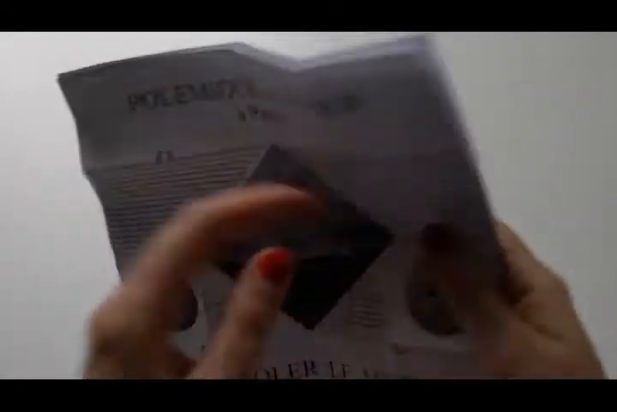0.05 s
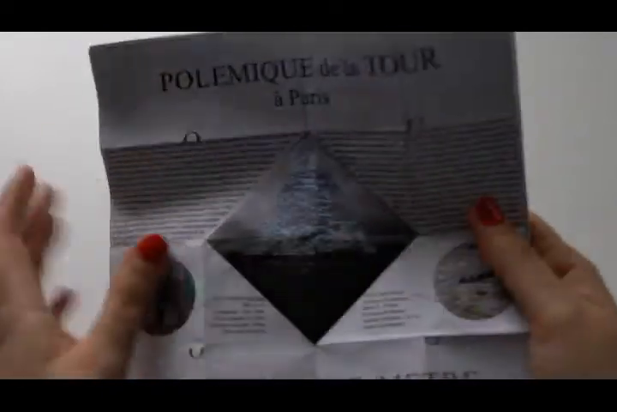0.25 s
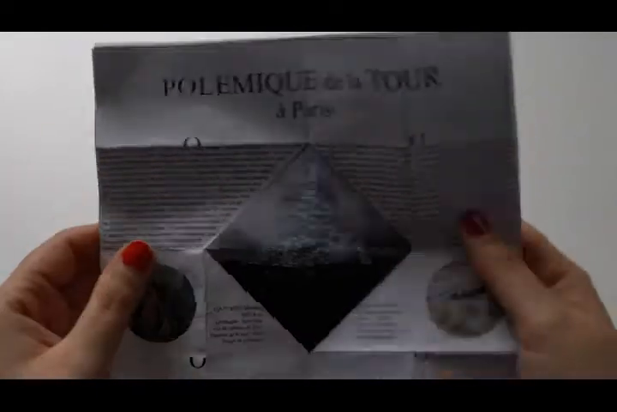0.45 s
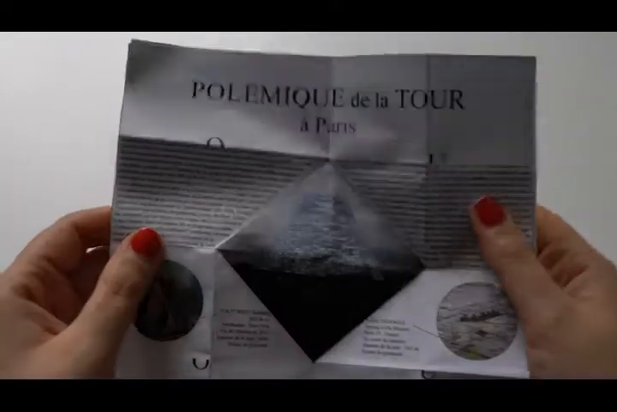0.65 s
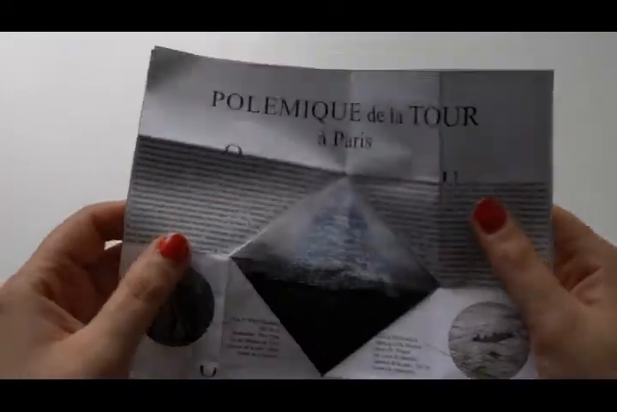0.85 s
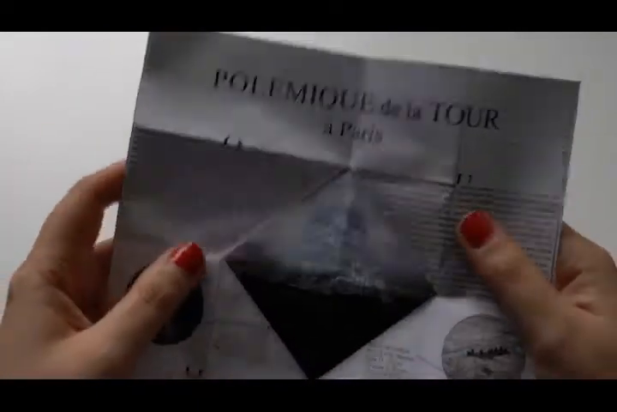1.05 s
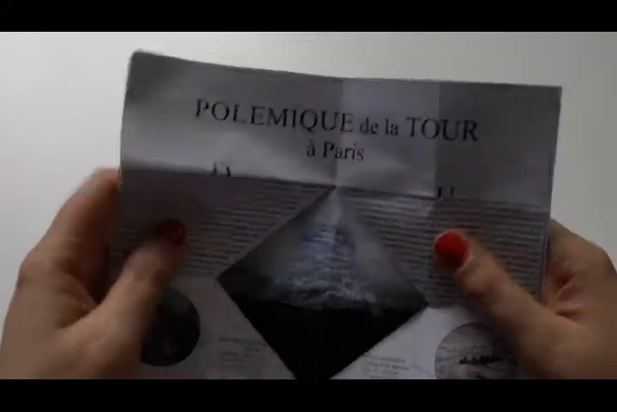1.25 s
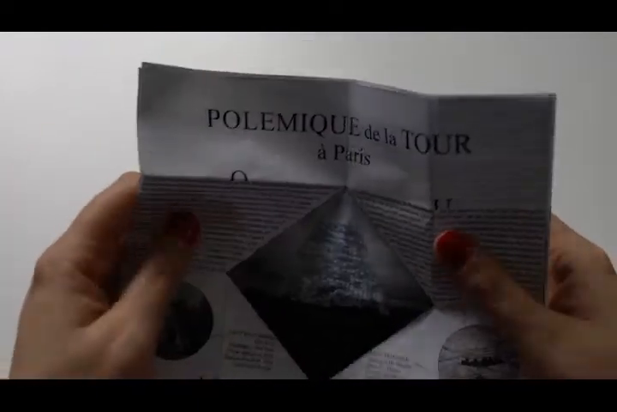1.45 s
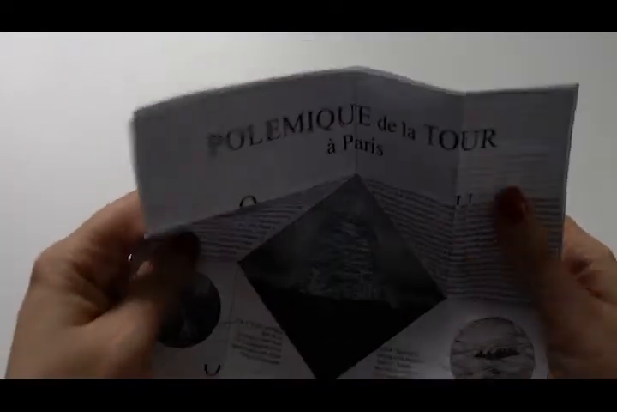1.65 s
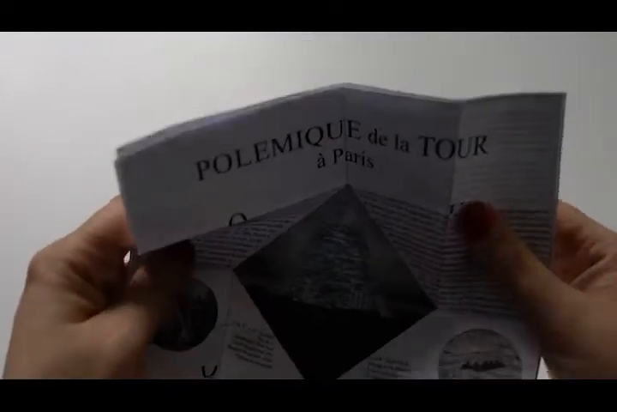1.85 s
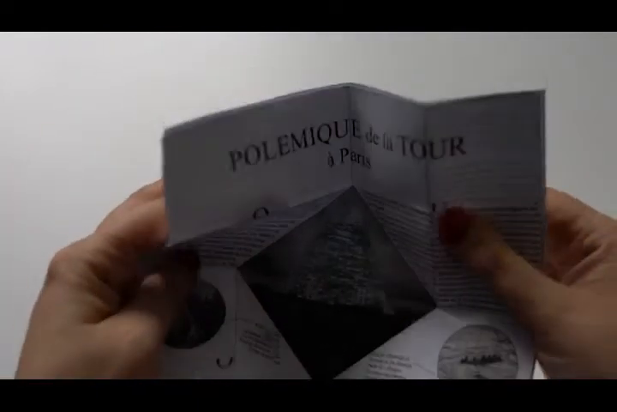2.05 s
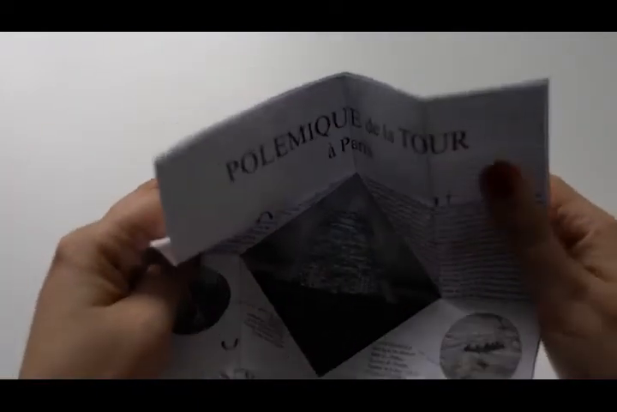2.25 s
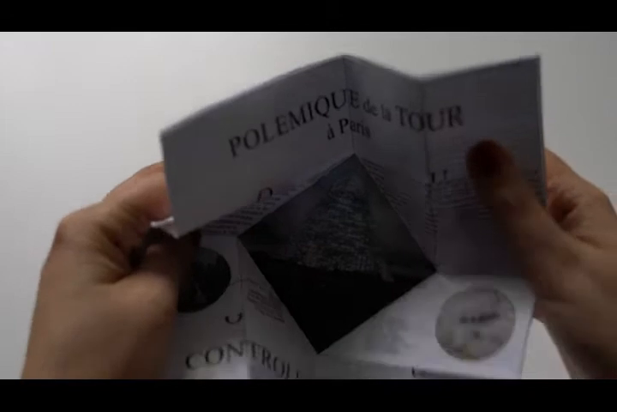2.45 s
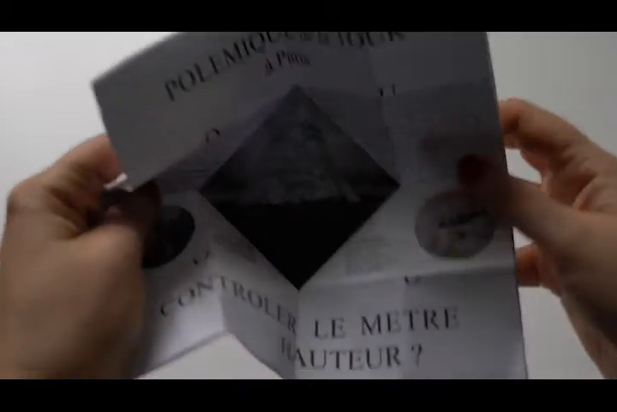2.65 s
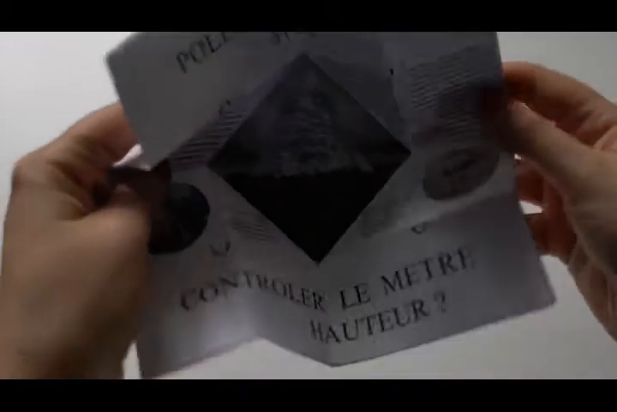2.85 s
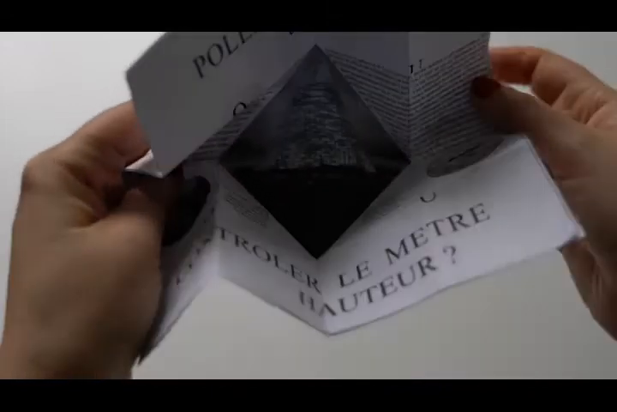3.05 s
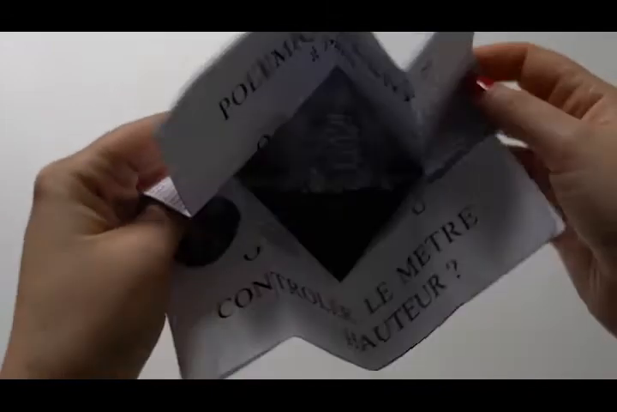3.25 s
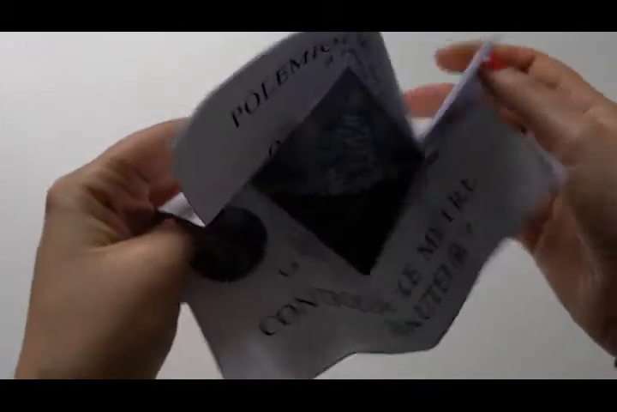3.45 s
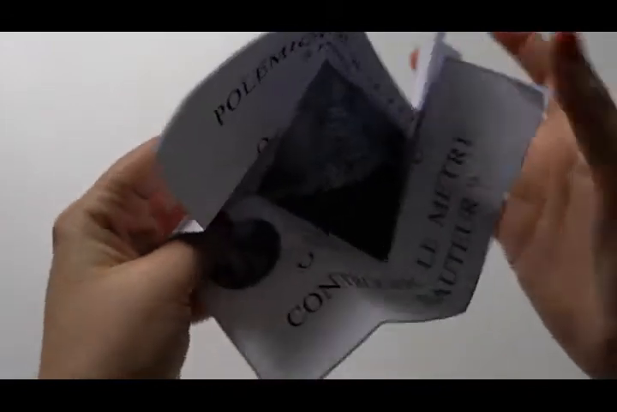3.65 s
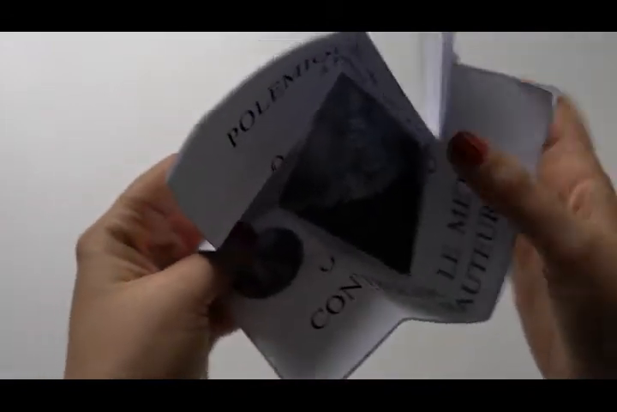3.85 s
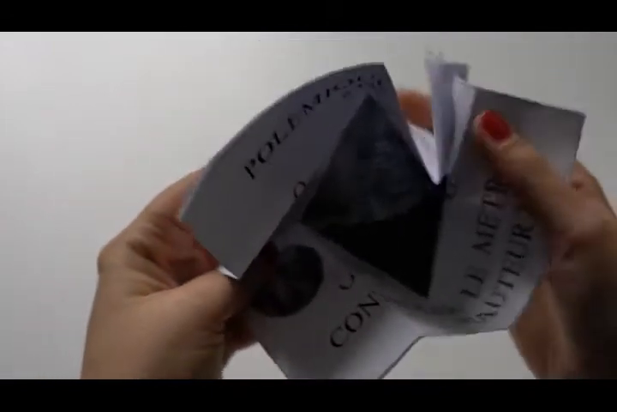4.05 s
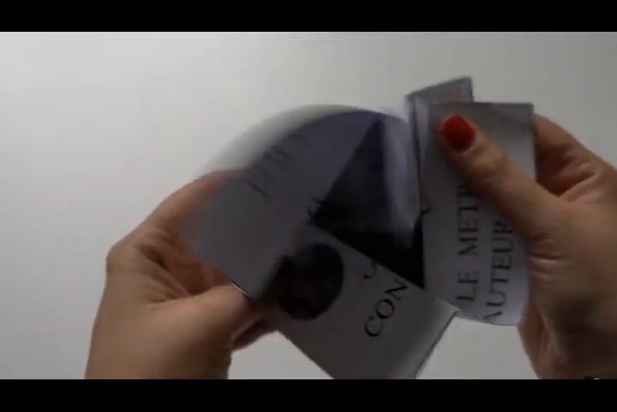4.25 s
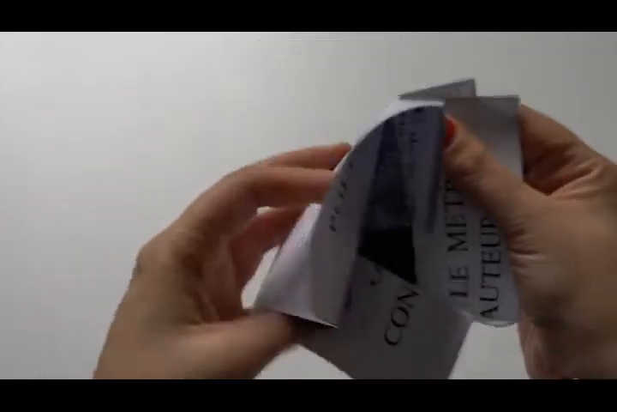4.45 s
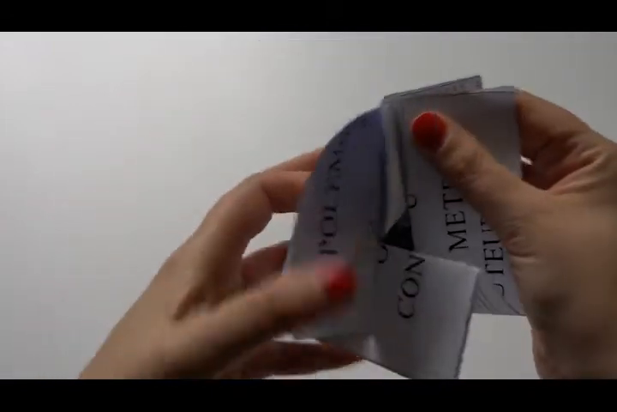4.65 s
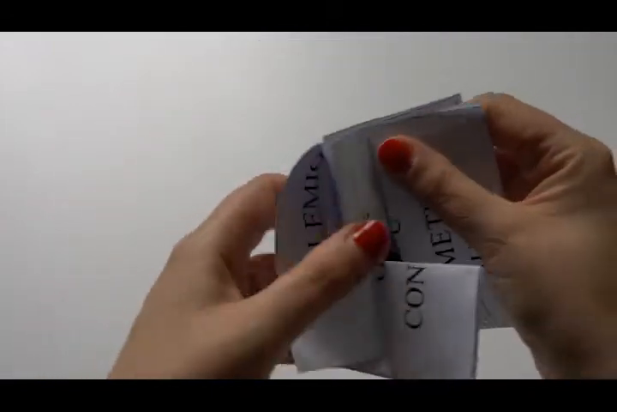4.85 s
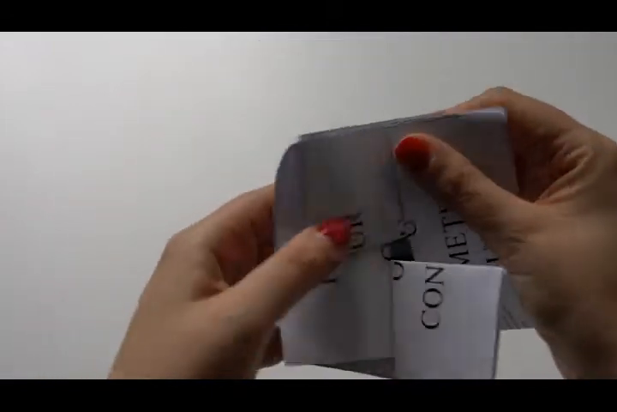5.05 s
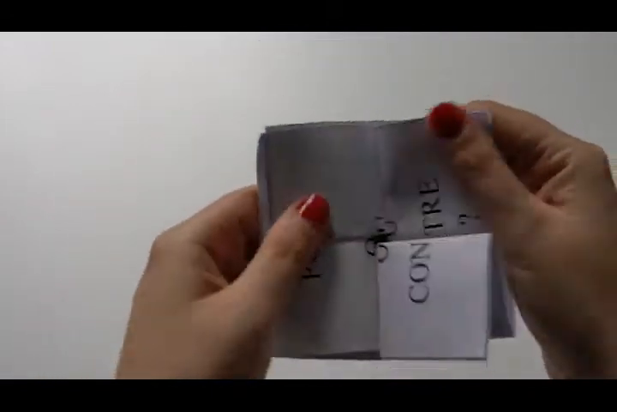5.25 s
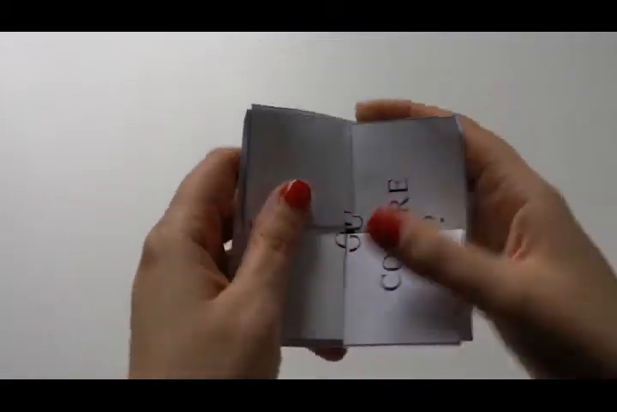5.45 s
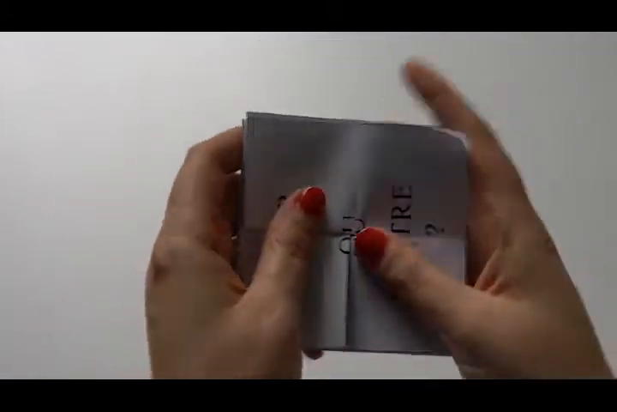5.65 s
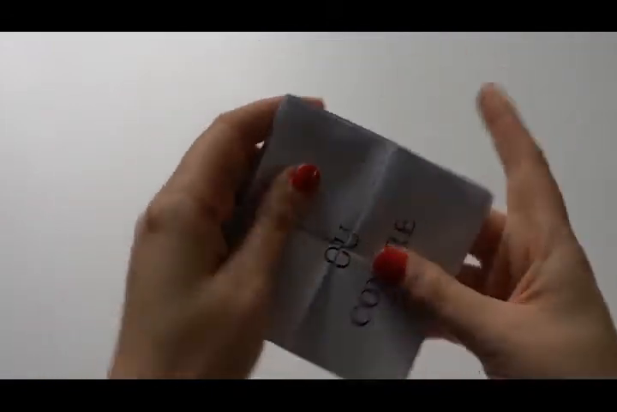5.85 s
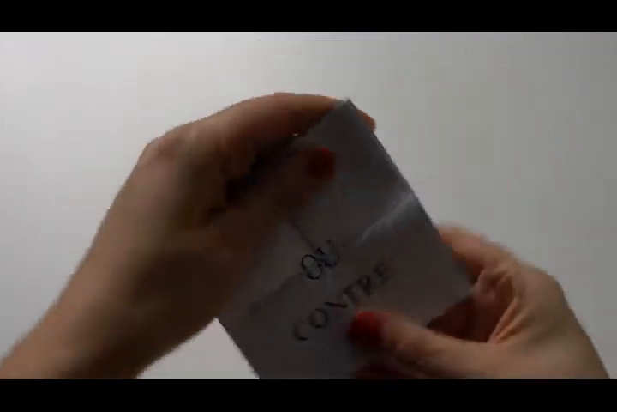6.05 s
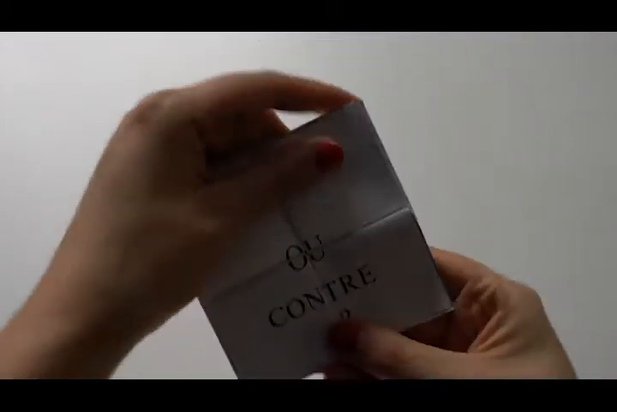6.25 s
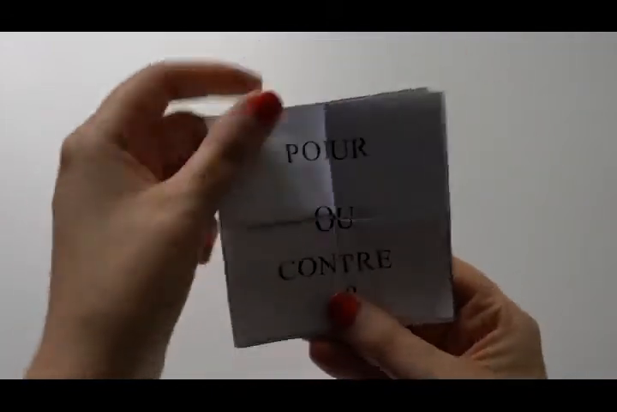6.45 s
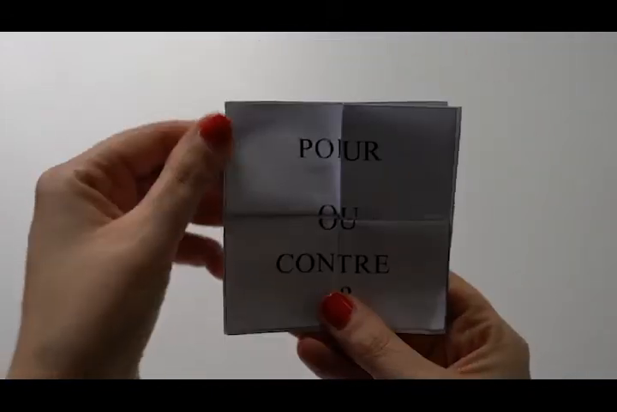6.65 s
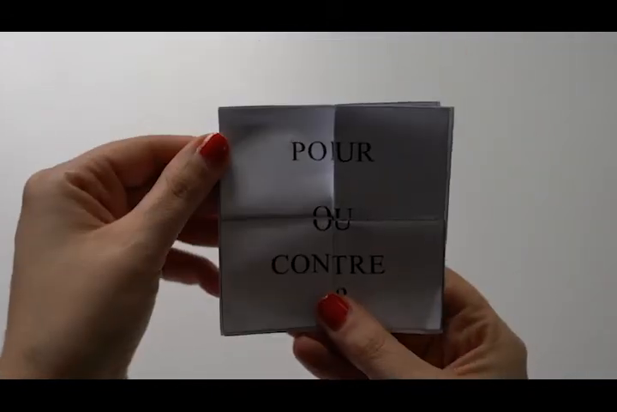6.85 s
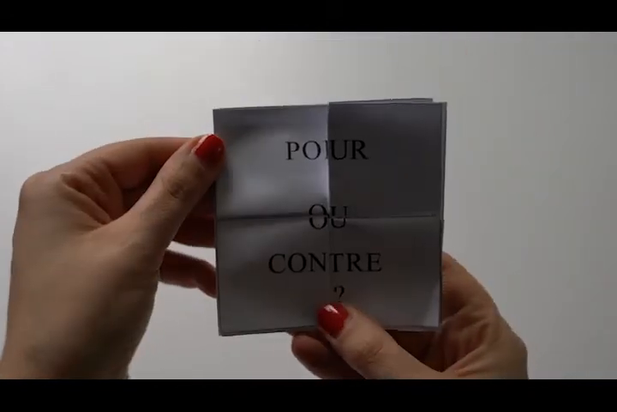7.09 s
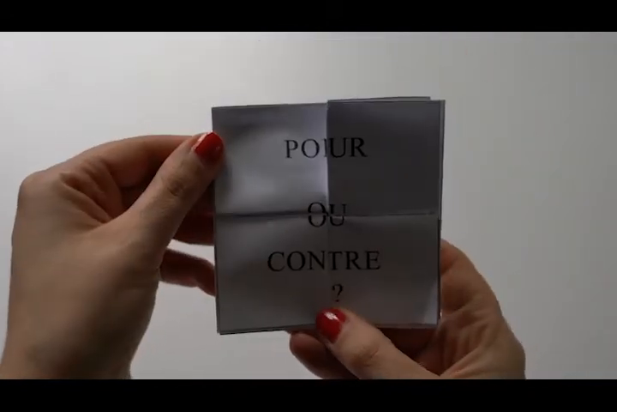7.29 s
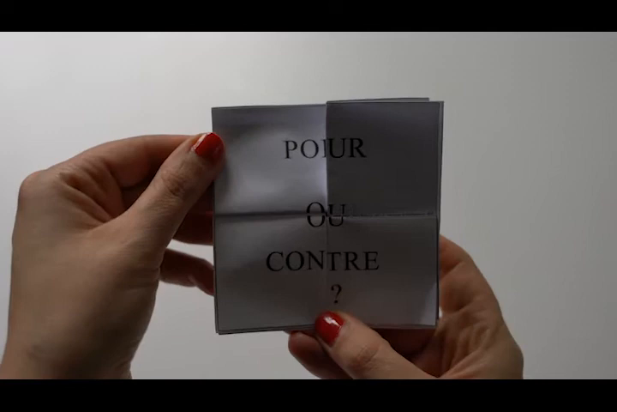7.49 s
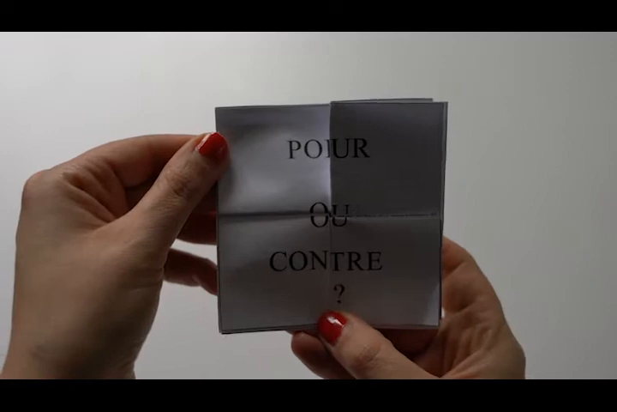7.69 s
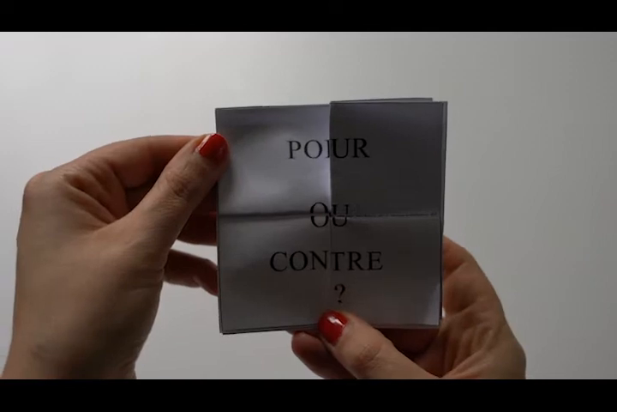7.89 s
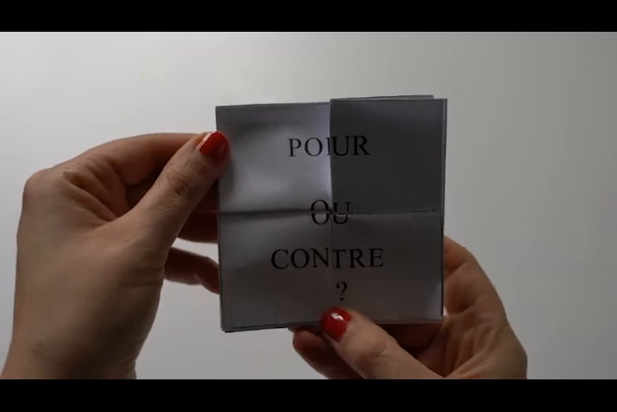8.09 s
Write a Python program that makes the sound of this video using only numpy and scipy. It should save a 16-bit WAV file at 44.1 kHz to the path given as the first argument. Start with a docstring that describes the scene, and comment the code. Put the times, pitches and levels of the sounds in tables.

```python
"""First comes a soft rub of paper over a quiet room with a distant hum; light snaps follow almost at once.
Two hands fold a printed paper leaflet above a desk, close to a camera.
Creases snap as short noise bursts ringing resonances; rubbing faces and hissing fingertips are
coloured, grainy noise shaped by strokes. Swung panels puff air, and the desk and walls answer the
snaps. The hum is a few unsteady sine tones over coloured noise."""
import sys
import numpy as np
from scipy import signal
from scipy.fft import rfft, irfft, next_fast_len
from scipy.io import wavfile
from scipy.ndimage import uniform_filter1d, map_coordinates

SR = 44100
rng = np.random.default_rng(int(sys.argv[2]) if len(sys.argv) > 2 else 0)


def persist_wave(psi):
    """Save psi, clipped to +-1, as 16-bit WAV."""
    counts = np.round(np.clip(psi, -1, 1) * 32767).astype(np.int16)
    wavfile.write(sys.argv[1], SR, np.atleast_2d(counts).T)


N = 358091

# Buckling creases; levels are the energy of each part, before a shared trim:
# (time [s], panel [dB], panel pitch [Hz], flap [dB], flap pitch [Hz], crack [dB], fibres [dB],
#  time the after-slips take to drop 9 dB [ms])
CREASE_SNAPS = [(0.0533, -30.5, 1710, -31.5, 477, -42.5, -55, 1.5),
                (0.0898, -28.5, 990, -30, 398, -46, -47, 1.6),
                (0.0993, -30, 1110, -25.5, 336, -31, -33, 5.7),
                (0.2363, -32, 1190, -25, 362, -42, -47, 1.3),
                (0.249, -23.5, 1290, -23.5, 308, -44, -38, 1.9),
                (0.4487, -29.5, 860, -24.5, 493, -32, -31.5, 7),
                (1.28, -18.5, 1640, -20.5, 467, -16, -19, 2.6),
                (1.2886, -17.5, 1140, -22, 306, -25, -9, 3.2), (1.315, -24, 960, -19.5, 454, -43, -37, 4.9),
                (1.4543, -28.5, 1650, -47, 400, -46, -49, 2.3),
                (1.5662, -17, 1640, -18.5, 382, -26, -52, 2.3),
                (1.6697, -26, 1290, -32, 370, -29, -28, 3.9), (1.745, -22, 1230, -33, 390, -43, -48, 1.6),
                (1.9127, -25, 1400, -23, 365, -30, -49, 2.9), (2.061, -11, 1600, -12, 277, -14.5, -36, 6),
                (2.2829, -13.5, 1440, -23.5, 380, -21, -33, 1.4),
                (2.385, -23.5, 940, -33, 327, -36, -52, 3.9), (2.4888, -38, 1920, -44, 367, -27, -30, 3.6),
                (2.56, -25, 744, -27.5, 232, -39, -50, 2.6), (2.6984, -15.5, 1290, -32, 247, -27, -38, 2.9),
                (2.891, -22, 1300, -23.5, 500, -38, -50, 4.2),
                (2.907, -27, 1800, -30, 260, -29.5, -42, 0.5), (2.9327, -38, 724, -19.5, 460, -47, -39, 3),
                (2.9833, -25, 810, -25, 380, -43, -44, 6.2),
                (3.0101, -17.5, 1410, -16.5, 384, -45, -50, 2.1),
                (3.07, -23, 1200, -27.5, 560, -38, -35, 2.2), (3.147, -26, 1680, -51, 346, -31, -40, 0.5),
                (3.56, -30.5, 1310, -28.5, 346, -48, -50, 1.4),
                (3.6859, -26.5, 1430, -31.5, 415, -29.5, -40, 5.5),
                (3.9302, -24, 1270, -25.5, 430, -28, -41, 8.1),
                (3.955, -29, 1250, -22, 270, -27, -30.5, 3.5),
                (4.0805, -13.5, 1750, -21, 510, -24.5, -56, 4.5),
                (4.1595, -1.5, 2000, -18.5, 620, -7, -15.5, 1.8),
                (4.2276, -21, 1600, -24, 465, -14.5, -33, 1.3),
                (4.277, -15.5, 850, -28, 437, -14, -34.5, 5.9), (4.2959, -9.5, 2180, -22, 430, -17, -48, 1),
                (4.3259, -20, 810, -24.5, 286, -47, -45, 8.6),
                (4.356, -24.5, 1750, -22, 380, -47, -47, 8.6), (4.453, -18.5, 815, -37, 530, -45, -46, 1.9),
                (4.4862, -19, 1170, -35, 270, -54, -46, 1), (4.5477, -14, 1970, -36, 432, -36, -39, 15),
                (4.5587, -9, 2240, -22, 270, -18, -4, 6.6), (4.5628, -14, 2230, -25, 295, -9, -20.5, 3.1),
                (4.9886, -8, 1540, -26.5, 334, -11, -43, 1.5), (5.0138, -15, 1850, -29, 356, -24, -46, 4.2),
                (5.056, -18.5, 1790, -23.5, 367, -27, -43, 1.5),
                (5.0883, -16, 2320, -29, 385, -5, -40, 0.25), (5.232, -36, 1240, -24, 283, -22, -26, 4.4),
                (5.3297, -3.5, 2220, -29, 396, -24, -53, 1.9),
                (5.4806, -14, 1460, -23, 495, -8.5, -3.5, 1.8),
                (5.605, -6.5, 1460, -18.5, 420, -2.5, -4, 2.3), (5.637, -22, 1260, -27, 330, -30, -42, 2),
                (5.8391, -18.5, 2300, -32, 332, -20, -57, 1.6),
                (5.978, -26.5, 1420, -34, 320, -39, -43, 2.6), (6.0393, -24, 850, -60, 470, -29.5, -37, 2),
                (6.2072, -29, 1760, -36.5, 290, -22.5, -24, 3.2),
                (6.3077, -20.5, 1120, -19.5, 470, -25, -31, 1.9),
                (6.389, -36, 2170, -48, 400, -27.5, -26, 4.6), (6.569, -39, 2000, -50, 400, -41, -32, 2.7),
                (6.7942, -30, 1360, -31, 580, -32, -54, 4),
                (6.813, -16, 1900, -21.5, 764, -23.5, -66.5, 3.2),
                (7.295, -57, 2700, -60, 400, -44, -51, 6.8), (7.481, -42.5, 1590, -55, 308, -39, -57, 5)]
# Puffs of air from a swung panel, before a shared boost: (time [s], level [dB], pitch [Hz])
AIR_PUFFS = [(0.236, -63, 81.5), (1.345, -58, 116), (2.576, -70, 118), (2.704, -63, 116),
             (3.962, -62.5, 114), (4.309, -70, 61.9)]
# Colours of the rubbing sounds, only their shape matters: (frequency [Hz], level per Hz [dB])
FLUTTER_COLOUR = [(120, -26.5), (250, 1.5), (450, -2.5), (800, -1), (8000, -55)]  # loose panels
OPEN_FACE_COLOUR = [(400, -42), (750, -9), (1000, -15), (1300, 0), (1750, -5), (2250, -0.5), (3500, -8),
                    (16000, -52)]  # faces of the open sheet
PACKET_COLOUR = [(400, -32), (1000, -11), (1600, -4), (2200, -6.5), (3100, -3), (16000, -47)]  # faces once folded small and stiff
EDGE_COLOUR = [(1200, -21), (2800, -7.5), (4000, -2), (6000, -3), (8500, -8.5), (16000, -17.5)]  # scraping edges
SKIN_COLOUR = [(2000, -15), (5000, -5), (8000, 9.5), (11000, 7), (16000, -1.5)]  # fingertips on the print
# How alike paper sounds left and right: (frequency [Hz], likeness [1 = same])
PAPER_ALIKE = [(60, 0.97), (180, 1), (550, 0.99), (1650, 0.8), (4970, 0.31), (15000, 0.2)]
# Left-right balance of the paper: (frequency [Hz], left over right [dB])
PAPER_BALANCE = [(60, -3), (180, 0.5), (550, -0.5), (1650, -2.0), (4970, -3.0), (15000, -6.5)]
# Tones of the distant appliance: (frequency [Hz], rms level [dB])
HUM_TONES = [(64.6, -84), (134.6, -66), (204.6, -77.5), (371.4, -81)]
# Colour of the room tone, only its shape matters: (frequency [Hz], level per Hz [dB])
ROOM_COLOUR = [(15, -8.5), (30, -17.5), (70, -4), (110, -6.5), (200, -9), (400, -14), (800, -17.5),
               (2000, -24), (5000, -29), (16000, -33.5)]
# How alike the room tone is left and right: (frequency [Hz], likeness [1 = same])
ROOM_ALIKE = [(60, 1), (180, 0.94), (550, 0.28), (1650, 0.0), (4970, 0.061), (15000, 0.38)]
# Time the wall echoes take to drop 60 dB: (frequency [Hz], time [s])
WALL_FADE = [(300, 0.38), (2000, 0.67), (6000, 0.67), (14000, 0.37)]
# Hard reflections from the desk: (delay [s], level [dB])
DESK_ECHOES = [(.0072, -27), (0.012, -25)]
# How much of the sheet is folded up: (time [s], share [0 to 1])
FOLDED_SHARE = [(3.7, 0.019), (4.5, 0.78)]
# Strokes of paper on paper and skin:
# (peak time [s], rubbing [dB], scraping [dB], swell time [s], fade time [s])
HAND_STROKES = [(0.01, -61.5, -65, .1, 0.092), (.11, -62.5, -56, 0.086, 0.044),
                (0.231, -56, -57, 0.091, 0.037), (0.328, -66.5, -69, 0.12, 0.077),
                (.455, -61, -65, 0.0087, 0.058), (.52, -61.5, -62.5, 0.12, 0.21),
                (.83, -65, -63.5, 0.055, 0.18), (.95, -58.5, -60, 0.081, 0.18),
                (1.14, -54.5, -56.5, 0.065, 0.096), (1.301, -48.5, -49, 0.032, 0.09),
                (1.47, -58, -68, 0.042, 0.11), (1.57, -59, -61, 0.1, 0.076),
                (1.68, -61.5, -57.5, 0.087, 0.16), (1.95, -58.5, -65, 0.54, 0.081),
                (2.049, -49, -53, 0.064, 0.061), (2.169, -57, -85, .03, 0.027),
                (2.23, -66, -60.5, 0.12, 0.07), (2.29, -56, -61.5, 0.088, 0.16),
                (2.57, -57, -54.5, 0.11, 0.12), (2.7, -61, -66, 0.28, 0.073),
                (2.85, -53.5, -58.5, 0.057, 0.032), (2.96, -53, -59, 0.19, 0.24),
                (3.167, -49.5, -58.5, 0.064, 0.056), (3.255, -51, -58, 0.032, 0.051),
                (3.3, -51, -57.5, 0.039, 0.056), (3.43, -59, -68, 0.016, 0.079),
                (3.49, -54, -55, 0.078, 0.056), (3.64, -59.5, -61.5, 0.61, 0.24),
                (3.938, -52.5, -54, 0.061, 0.078), (4.01, -56, -55.5, 0.046, 0.037),
                (4.09, -63.5, -93, 0.016, 0.066), (4.166, -43, -50.5, 0.0095, 0.16),
                (4.3, -55.5, -56.5, 0.32, 0.078), (4.5, -59, -61, 0.34, 0.095),
                (4.56, -41, -43.5, 0.022, 0.026), (4.6, -58.5, -59.5, .04, 0.25),
                (4.869, -55.5, -59, 0.084, 0.26), (5.0, -51, -56.5, 0.031, 0.094),
                (5.09, -49, -50.5, 0.0065, 0.19), (5.2, -52, -52, 0.034, 0.17),
                (5.34, -52, -73, 0.036, 0.18), (5.45, -70, -54, 0.28, 0.056), (5.49, -51, -50, 0.019, 0.14),
                (5.62, -52.5, -44.5, 0.022, 0.06), (5.75, -55.5, -51, 0.15, 0.054),
                (5.85, -60, -55, 0.067, 0.15), (5.99, -61.5, -55, 0.11, .15),
                (6.14, -62.5, -61, 0.029, 0.14), (6.23, -70, -57, 0.045, 0.15),
                (6.32, -60, -56.5, 0.1, 0.053), (6.41, -66.5, -55.5, 0.12, 0.12),
                (6.58, -70, -61.5, 0.034, 0.21), (6.73, -74, -67, 0.081, 0.17),
                (6.81, -68, -71, 0.1, 0.086), (7.03, -74.5, -72.5, 0.19, 0.12),
                (7.2, -75, -74.5, 0.087, 0.064), (7.3, -71, -73, 0.027, 0.091), (7.49, -83, -77, .05, 0.2)]
# How loosely the sheet is held and how much skin touches it:
# (time [s], flutter over rubbing [dB], fingertip hiss over scraping [dB])
GRIP_CHANGES = [(0, -2, -3.5), (.5, -7.5, 0), (1, -4.5, -5.5), (1.5, -1, -4), (2.001, -5.5, -13),
                (2.55, -1.5, -5.5), (3, -5, -6), (3.2, -5.5, -4), (3.7, -9, -3.5), (4, 1.5, 2),
                (4.2, -12.5, -12.5), (4.6, -4, 3), (4.8, -9, -5), (5.1, -12.5, -14), (5.6, -8, -6),
                (6, -8, -8), (6.4, -5, -15), (6.8, -3.5, -12), (7.5, 1.5, -16)]
# The held span of paper rings at a pitch that moves with the grip: (time [s], pitch [Hz])
SPAN_RING = [(0, 1550), (.7, 1490), (1.3, 1320), (1.46, 1630), (1.75, 1320), (1.95, 1600), (2.2, 1600),
             (2.7, 1400), (2.85, 1224), (3.25, 1210), (3.4, 1470), (3.9, 1410), (4.1, 1920), (4.5, 2220),
             (5.0, 1840), (5.15, 2230), (6.5, 2150), (6.53, 3800), (6.77, 4000), (6.8, 2050), (7, 2000),
             (7.15, 3900)]
# The hands move across: (time [s], left over right [dB])
HAND_DRIFT = [(0, .5), (1, 0), (3.5, -.5), (4.7, -1), (5.3, -0.5), (6.5, 1)]

SLOPE_DB = 12  # a stroke gains this over its swell and loses it over its fade
ROUNDNESS = 1.18  # stroke shape: 1 = pointed peak, 2 = bell
HISS_GROWS, HISS_PIVOT_DB = 1.13, -60.5  # the hiss swings wider than the scraping, about this level
RING_DB, RING_OCTAVES = 5, 0.08  # mean height and half width of the held span's ring
CRACK_HZ, CRACK_SCATTER = 3180, 0.06  # crack pitch, and its spread from snap to snap (share)
JOLT = 7  # strength of the first jolt, as the panel and flap feel it
EARLY_DB, EARLY_T60_S = 5, 0.11  # near surfaces: a dense first answer over the tail
TOP_HZ = 15900  # upper band limit


def amp(db):
    """Turn dB into a gain."""
    return 10 ** (np.asarray(db) / 20)


def unit(x):
    """Scale a sound to rms 1."""
    return x / np.sqrt(np.mean(x ** 2) + 1e-20)


def along(points, hz):
    """Read a (frequency, value) table at any frequency, on a log axis."""
    f, v = np.transpose(points)
    return np.interp(np.log(hz + 1), np.log(f + 1), v)


def over_time(times, values):
    """Join points in time with straight lines, one value per sample."""
    return np.interp(np.arange(N) / SR, times, values)


def wobble(rate):
    """Make a smooth random curve with rate knots a second."""
    knots = rng.standard_normal(int(N * rate / SR) + 4)
    return map_coordinates(knots, [np.arange(N) * rate / SR])


def filtered(x, response):
    """Multiply the spectrum of x by a response of frequency."""
    m = next_fast_len(N + SR // 2)
    return irfft(rfft(x, m) * response(np.fft.rfftfreq(m, 1 / SR)), m)[..., :N]


def mix_angle(alike, hz):
    """Angle that blends two unrelated signals to the wanted left-right likeness."""
    return np.arccos(np.clip(along(alike, hz), -1, 1)) / 2


def spread(pair, spectrum, alike):
    """Colour two unrelated signals and mix them to a stereo pair of rms 1."""
    def response(hz):
        angle = mix_angle(alike, hz)
        return amp(along(spectrum, hz)) * [np.cos(angle), np.sin(angle)]

    mid, side = filtered(pair, response)
    return unit(np.array([mid + side, mid - side]))


def resonance(x, hz, width_hz):
    """Ring a damped resonance with steep skirts, scaled to energy 1."""
    mode = signal.iirpeak(hz, hz / width_hz, SR)
    rung = signal.lfilter(*mode, signal.lfilter(*mode, x))
    y = signal.lfilter(*signal.butter(2, min(2.7 * hz, .45 * SR), fs=SR), rung)
    return y / np.linalg.norm(y, axis=-1, keepdims=True)


def room_tone():
    """A slightly unsteady hum over rumble and the microphone's own hiss."""
    t = np.arange(N) / SR
    hum = np.zeros(N)
    for hz, db in HUM_TONES:
        level = np.sqrt(2) * amp(db + 0.3 * wobble(6.1))
        hum += level * np.sin(2 * np.pi * hz * t + 0.57 * wobble(4.2))
    return hum + amp(-65.5) * spread(rng.standard_normal((2, N)), ROOM_COLOUR, ROOM_ALIKE)


def walls(x):
    """The desk throws back two early copies; a diffuse tail, new for each stretch of time, joins them."""
    out, step = np.zeros((2, N + SR)), SR // 4
    for i in range(0, N, step):
        hz, t, z = signal.stft(rng.standard_normal((2, SR // 2)), SR, nperseg=256)
        angle = mix_angle(PAPER_ALIKE, hz)[:, None]  # long waves reach both microphones alike
        mid, side = z[0] * np.cos(angle), z[1] * np.sin(angle)
        late = amp(-60 * t / along(WALL_FADE, hz)[:, None])
        early = amp(EARLY_DB - 60 * t / EARLY_T60_S)
        stereo = np.array([mid + side, mid - side])
        tail = signal.istft(stereo * (late + early), SR, nperseg=256)[1]
        wet = signal.fftconvolve(x[None, i:i + step], tail / np.linalg.norm(tail[0]), axes=1)
        out[:, i + round(.0065 * SR):][:, :wet.shape[1]] += amp(-10.0) * wet
    for delay, db in DESK_ECHOES:
        out[:, round(delay * SR):][:, :N] += amp(db) * x
    return out[:, :N]


def puffs():
    """A swung panel pushes air at the microphone: a soft low thump, a fast-fading sine."""
    out, t = np.zeros(N + SR), np.arange(SR // 8) / SR
    for s, db, hz in AIR_PUFFS:
        fade = amp(db + 14.5 - 60 * t / 0.088)
        onset = np.minimum(1, t / 0.0014)
        out[round(s * SR):][:len(t)] += fade * onset * np.sin(2 * np.pi * hz * t)
    return out[:N]


def strokes():
    """Rubbing and scraping level in dB: every stroke swells to its peak and fades; their powers add."""
    s, rub_db, scrape_db, swell, fade = np.transpose(HAND_STROKES)[:, :, None]
    t = np.arange(0, N + 64, 64) / SR  # a coarse clock is enough for slow levels
    rising, falling = (s - t) / np.maximum(swell, .005), (t - s) / np.maximum(fade, .005)
    shape_db = -SLOPE_DB * np.where(t < s, rising, falling) ** ROUNDNESS
    levels = []
    for peak_db in (rub_db, scrape_db):
        power = np.sum(amp(peak_db + shape_db) ** 2, axis=0)
        levels.append(over_time(t, 10 * np.log10(power + 1e-14)))
    return levels


def friction(spectrum, grain_db, clump_db, patchy_db, ring_db=0):
    """Fibres slip in uneven, clumped grains; the colour drifts in patches, around the held span's ring."""
    grain_size = np.minimum(rng.exponential(size=N), 6)
    grains = rng.standard_normal((2, N)) * amp(grain_db * grain_size + clump_db * wobble(70))
    hz, t, z = signal.stft(grains, SR, nperseg=384)
    octaves = np.log2((hz[:, None] + 1) / np.interp(t, *np.transpose(SPAN_RING)))  # distance from the ring
    comes_and_goes = np.interp(t, np.arange(N) / SR, np.clip(1 + 0.6 * wobble(9), 0, 2))
    z = z * amp(ring_db * comes_and_goes * np.exp(-.5 * (octaves / RING_OCTAVES) ** 2))
    field = uniform_filter1d(rng.standard_normal(z.shape[1:]), size=4, axis=0)  # smooth over frequency
    field = uniform_filter1d(field, size=10, axis=1)  # then over time
    patchy = signal.istft(z * amp(patchy_db * unit(field)), nperseg=384)[1][:, :N]
    return spread(patchy, spectrum, PAPER_ALIKE)


def hands():
    """Rubbing drives faces and panels, scraping the edges and fingertips; folding shifts faces and hiss."""
    rub_db, scrape_db = strokes()
    grip_s, flutter_db, touch_db = np.transpose(GRIP_CHANGES)
    loose_db, skin_db = over_time(grip_s, flutter_db), over_time(grip_s, touch_db)
    share = np.clip(over_time(*np.transpose(FOLDED_SHARE)), 0, 1)

    flutter = amp(rub_db + loose_db + 1.5 * wobble(8))
    panels = friction(FLUTTER_COLOUR, grain_db=1, clump_db=1.8, patchy_db=2.2)

    open_faces = friction(OPEN_FACE_COLOUR, grain_db=3.5, clump_db=2.0, patchy_db=3.0, ring_db=RING_DB)
    packet = friction(PACKET_COLOUR, grain_db=3.0, clump_db=4.5, patchy_db=2.5, ring_db=RING_DB)
    faces = np.sqrt(1 - share) * open_faces + np.sqrt(share) * packet

    edges = friction(EDGE_COLOUR, grain_db=2.5, clump_db=1.0, patchy_db=2.0, ring_db=RING_DB)

    hiss_db = HISS_PIVOT_DB + HISS_GROWS * (scrape_db - HISS_PIVOT_DB)
    skin = amp(hiss_db + skin_db + 4.3 * wobble(7))
    hiss = friction(SKIN_COLOUR, grain_db=2.0, clump_db=2.0, patchy_db=0.5)
    # stacked layers damp the finest hiss, with a bump just below the cutoff
    muffled = signal.lfilter(*signal.cheby1(3, 4, 8900, fs=SR), hiss)
    fingertips = (1 - share) * hiss + amp(5.0) * share * muffled
    return flutter * panels + amp(rub_db) * faces + amp(scrape_db) * edges + skin * fingertips


def snaps():
    """A crease buckles in a jolt and after-slips that ring its panel, flap the sheet, crack and tear fibres.

    Rows 0 and 1 reach the two microphones; row 2, mostly the jolt, leaves towards the walls."""
    out, ms = np.zeros((3, N + SR)), np.arange(SR // 20) * 1000 / SR
    for s, panel_db, panel_hz, flap_db, flap_hz, crack_db, fibre_db, length in CREASE_SNAPS:
        crack_hz = CRACK_HZ * np.exp(CRACK_SCATTER * rng.standard_normal())
        common, left, right = rng.standard_normal((3, len(ms)))
        # slightly different paths to the two microphones
        slips = np.array([common + 0.28 * left, common + 0.32 * right, 0.14 * common])
        slips = slips * 0.87 * amp(-9 * ms / max(length, .3))
        slips[:, 0] = 1  # the jolt
        bend = slips.copy()
        bend[:, 0] = JOLT
        panel = resonance(bend, panel_hz, 0.67 * panel_hz)
        flap = resonance(bend.mean(0), flap_hz, 0.59 * flap_hz)
        crack = resonance(slips, crack_hz, 0.66 * crack_hz)
        fibres = resonance(slips, 5100, 4100) + amp(-15.5) * resonance(slips, 12250, 7500)
        snap = amp(panel_db) * panel + amp(flap_db) * flap + amp(crack_db) * crack + amp(fibre_db) * fibres
        out[:, round((s - .0003) * SR):][:, :len(ms)] += snap
    return amp(-1.5) * out[:, :N]


def scene():
    """Paper, its echoes and the room; the camera body shades the left microphone from the paper's treble."""
    creases = snaps()
    paper = creases[:2] + walls(creases[2]) + hands()
    halves = [.5, -.5]  # each balance is split between left and right
    paper = paper * amp(np.outer(halves, over_time(*np.transpose(HAND_DRIFT))))
    shaded = filtered(paper, lambda hz: amp(np.outer(halves, along(PAPER_BALANCE, hz))))
    return shaded + puffs() + room_tone()


def record(dry):
    """The camera keeps nothing above its band limit."""
    return filtered(dry, lambda hz: hz < TOP_HZ)


dry = scene()
out = record(dry)
persist_wave(out)
```